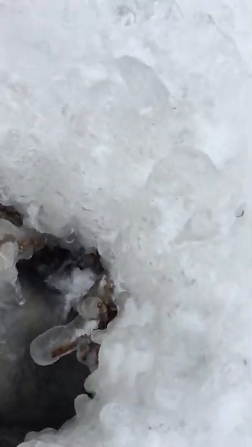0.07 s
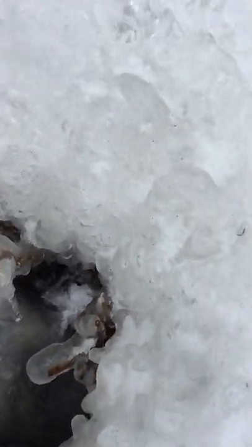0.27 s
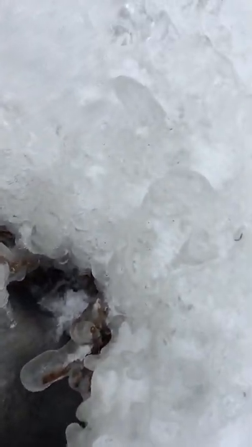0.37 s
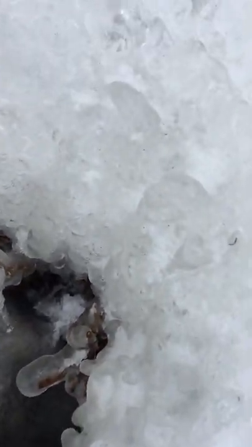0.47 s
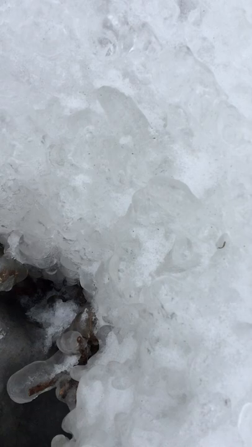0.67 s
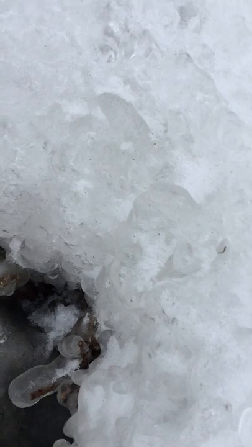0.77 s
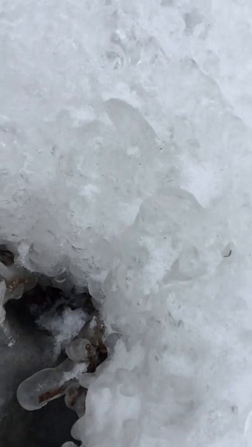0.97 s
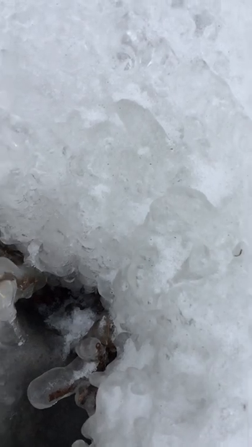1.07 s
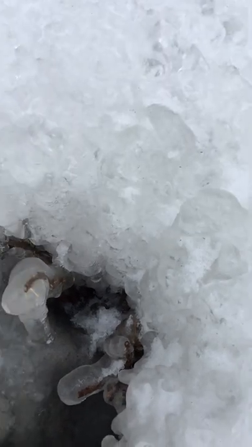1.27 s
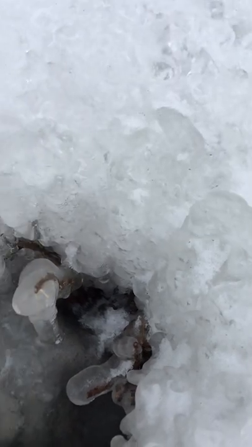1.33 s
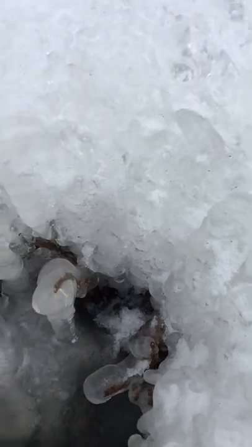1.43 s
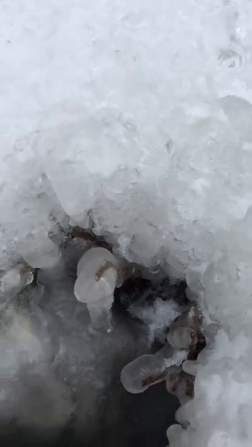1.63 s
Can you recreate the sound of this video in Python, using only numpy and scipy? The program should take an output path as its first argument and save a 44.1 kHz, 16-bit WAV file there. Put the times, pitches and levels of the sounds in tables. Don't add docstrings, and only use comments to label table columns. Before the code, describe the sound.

Wind buffeting on a handheld microphone outdoors: quiet low rumble at first, then soft bassy thuds from 0.2 s, strongest around 0.43-0.65 s, and lesser gusts until 1.1 s. Tiny dry handling ticks come near 0.3, 0.43, 0.54, 0.65-0.75 and 1.05 s, with faint skin rustle and a sharper snap at 0.99 s. Afterwards dull distant wash, faint wavering hum and steady hiss remain; a thin high tick at 1.64 s.

```python
import sys
import numpy as np
from scipy import signal
from scipy.io import wavfile

SR = 44100
rng = np.random.default_rng(int(sys.argv[2]) if len(sys.argv) > 2 else 0)


def generate_wav(signal):
    frames = np.transpose(np.atleast_2d(signal))
    scaled = np.clip(frames, -1, 1) * 32767
    pcm = np.round(scaled).astype(np.int16)
    wavfile.write(sys.argv[1], SR, pcm)


def boost_factor(decibels):
    exponent = np.asarray(decibels, float) / 20
    return 10 ** exponent


N = 74970


def filtered(x, kind, hz, order=2):
    return signal.sosfilt(signal.butter(order, np.clip(hz, 10, 0.45 * SR), kind, fs=SR, output="sos"), x)


def rms_one(x):
    return x / np.sqrt(np.mean(x ** 2) + 1e-20)


def in_time(rows):
    return boost_factor(np.interp(np.arange(N) / SR, *np.transpose(rows)))


def drift(rate):
    hop = 40
    r = np.exp(-2 * np.pi * rate * hop / SR)
    settle = 2000
    white = rng.standard_normal(N // hop + settle + 2)
    slow = signal.lfilter([1], [1, -2 * r, r * r], white)[settle:]
    return np.interp(np.arange(N) / hop, np.arange(len(slow)), rms_one(slow))


def coloured(spectrum, patchy_db):
    hz, db = np.transpose(spectrum)
    edges = 22 * 2 ** np.arange(0, 9.7, 1 / 3)
    white = rng.standard_normal((2, N + SR // 4))
    left = db[0] - 19
    right = db[-1] - 20 * (hz[-1] < SR / 4)
    out = 0
    for k, (low, high) in enumerate(zip(edges, edges[1:])):
        level_db = np.interp(np.log(low * high) / 2, np.log(hz), db, left=left, right=right)
        band = filtered(white[k % 2], "band", [low, high])[-N:]
        out = out + boost_factor(level_db + patchy_db * drift(3.4)) * band
    return rms_one(out)


def ring(clicks, hz, t60):
    r = boost_factor(-60 / (t60 * SR))
    w = 2 * np.pi * hz / SR
    return signal.lfilter([0, np.sin(w)], [1, -2 * r * np.cos(w), r * r], clicks + 1e-18)


def eddies(rows):
    t = np.arange(N) / SR
    phases = rng.uniform(0, 2 * np.pi, len(rows))
    out = 0
    for (s, db, hz, cycles), phase in zip(rows, phases):
        swell = np.exp(-2 * ((t - s) * hz / cycles) ** 2)
        out = out + boost_factor(db) * swell * np.cos(2 * np.pi * hz * (t - s) + phase)
    return out


def buffeting():
    # middle in seconds, peak in dB, frequency in Hz, width in cycles. Eddies of many
    eddy_rows = [(0.247, -38.5, 142, 1.9), (0.288, -37.5, 127, 3), (0.298, -31.5, 67.5, 1.67),
                 (0.415, -41, 172, 2.4), (0.427, -31.5, 241, 0.6), (0.433, -24.5, 150.3, 0.85),
                 (0.438, -41.5, 270, 2.9), (0.446, -31.5, 133, 1.1), (0.467, -32.5, 59, 1.8),
                 (0.47, -37.5, 132, 2.8), (0.474, -40.5, 218, 2.7), (0.502, -39.5, 307, 1.9),
                 (0.502, -35, 205, 2.4), (0.512, -32.5, 83, 1.6), (0.551, -40, 172, 1.3),
                 (0.567, -28.5, 111, 2.3), (0.568, -34.5, 184, 1.9), (0.595, -27, 105, 0.76),
                 (0.607, -31, 70.4, 1.1), (0.619, -27, 165, 0.92), (0.634, -27.5, 63, 0.98),
                 (0.707, -37, 96, 1.6), (0.786, -32, 72.3, 1.74), (0.864, -32.5, 73.5, 0.82),
                 (0.877, -30.5, 188, 0.55), (0.912, -37, 182, 1.65), (0.923, -32, 76.6, 1.15),
                 (0.937, -35, 187, 0.79), (1.016, -34.5, 54.3, 2.64), (1.04, -37.5, 202, 0.97),
                 (0.009, -44.5, 55.6, 2.3), (0.218, -43, 140, 3.8), (0.234, -47.5, 75, 4),
                 (0.326, -46.5, 95, 0.74), (0.404, -38.5, 97, 0.67), (0.41, -39, 301, 1.23),
                 (0.432, -33.5, 78.4, 1.4), (0.468, -47.5, 333, 2.5), (0.49, -42, 192, 1.3),
                 (0.567, -32, 61.3, 0.69), (0.58, -56, 162, 1.5), (0.595, -44.5, 203, 2.3),
                 (0.619, -49, 333, 2.9), (0.675, -47.5, 72, 1.9), (0.752, -44, 44.4, 5.5),
                 (0.782, -39.5, 125, 2.1), (0.84, -43.5, 52.6, 2.9), (0.888, -34, 65.4, 0.77),
                 (0.962, -44, 194, 1.1), (0.993, -39.5, 119, 1.4), (1.063, -42, 76, 4),
                 (1.079, -44.5, 130.5, 2.8), (1.12, -44, 40.4, 1.34), (1.322, -48, 56, 2.9),
                 (1.453, -56.5, 49.2, 11), (1.645, -41, 54, 0.55),
                 (0.249, -53, 292, 2.2), (.297, -49, 266, 1.8), (.623, -61, 410, 2.1),
                    (0.783, -48, 262, 0.86), (.545, -51.5, 402, 4.8), (0.912, -44.5, 334, 1.5),
                    (0.936, -49.5, 350, 1.7)]
    faint_rows = [(.08, -54, 63.5, 1.5), (.135, -56, 51.5, 1.9), (.215, -53, 210, 1.7),
                  (.36, -45, 61.5, 1.5), (.409, -60, 430, 1.8), (.427, -66, 470, 1.3),
                  (.467, -64, 450, 1.5), (.505, -59, 550, 3), (.616, -65, 430, 4), (.96, -45, 95, 1.2),
                  (1.38, -55.5, 115, 1.3), (1.525, -52, 55, 1.8)]
    push_rows = [(0.3, -47.5, 96, 1.3), (.232, -51.5, 264, 2), (0.23, -54, 160, 1.1), (.335, -46, 95, 2),
                 (0.36, -57, 265, 2.2), (0.46, -39, 41, 1.2), (0.99, -44, 105, 0.78)]
    return eddies(eddy_rows) + eddies(faint_rows) + eddies(push_rows)


def turbulence():
    # time in seconds, level in dB, upper edge in Hz.
    gust_rows = [(0, -51.5, 106), (.1, -53.5, 130), (.18, -62, 135), (0.219, -48, 200), (0.311, -51, 220),
                 (0.379, -55, 108), (0.409, -50.5, 288), (.62, -47.5, 258), (.67, -47, 125),
                 (.8, -52.5, 156), (.88, -62, 273), (0.968, -54, 260), (1.049, -59, 198), (1.12, -59, 110),
                 (1.2, -57, 150), (1.28, -71, 99), (1.4, -51, 97), (1.6, -67.5, 103)]
    s, db, hz = np.transpose(gust_rows)
    t = np.arange(N) / SR
    tops = np.geomspace(60, 340, 7)
    place = np.interp(np.log(np.interp(t, s, hz)), np.log(tops), np.arange(7))
    white = filtered(rng.standard_normal(N + SR // 4), "high", 42.3)
    out = 0
    for k, top in enumerate(tops):
        steep = filtered(white, "low", top, order=3)
        noise = rms_one(filtered(steep, "low", 0.49 * top, order=1)[-N:])
        out = out + noise * np.clip(1 - abs(place - k), 0, 1)
    lumps_db, lumps_per_s = 2, 12
    return out * boost_factor(np.interp(t, s, db) + lumps_db * drift(lumps_per_s))


def ticks():
    # start in seconds, peak in dB, ring in Hz, spread of the slips in seconds, bare edge in dB.
    tick_rows = [(.281, -59, 2300, 0.00094, -12), (.2827, -56, 2400, 0.00038, -6),
                 (0.2816, -58, 5660, .0004, -1), (.2828, -62, 14500, 0.00037, 0),
                 (.2892, -63, 5470, 0.00098, -1), (0.296, -59, 2500, .0015, -4),
                 (.297, -63, 11400, 0.0011, -4), (.2976, -60, 5100, 0.0012, -6),
                 (.3002, -63, 14100, 0.001, -10), (.3015, -66, 7100, .0008, -8),
                 (.31, -66, 6000, 0.0012, -3), (0.303, -69, 2300, 0.0015, -6),
                 (.433, -65, 2000, .0002, -15), (0.4334, -61.5, 3000, .0002, -12),
                 (0.433, -61, 4100, 0.000081, -13), (0.538, -63, 2210, 0.00075, -12),
                 (0.6542, -59.5, 3200, .0003, -16), (.6544, -60.5, 4250, .0002, -18),
                 (.6565, -60, 2700, 0.0007, -15), (.6816, -61, 6700, .0003, -20),
                 (.6858, -67, 6700, .00015, -20), (.6932, -68, 13600, 0.0011, -7),
                 (.6963, -59, 8000, 0.00045, -6), (0.697, -54, 2080, 0.0008, -8),
                 (.6962, -58, 2900, 0.0004, -10), (0.746, -63, 3920, 0.001, -18),
                 (1.0482, -60, 3250, .0016, -15), (1.0469, -59, 4030, .0006, -12),
                 (1.047, -59, 7200, .0008, -8), (1.048, -64, 5500, 0.00079, -10),
                 (1.643, -51, 10900, .001, -24), (1.643, -54, 12100, .0015, -24)]
    slip_loss_db, tone_db = 6, -4
    ring_cycles, ring_s = 9, 0.0014
    slip = np.arange(4)
    luck = rng.random((60, 2, 4))
    out = np.zeros(N)
    for (s, db, hz, spread, edge_db), (when, size) in zip(tick_rows, luck):
        late = np.round(hz * spread * (when + slip) / 2) / hz
        clicks = np.zeros(N)
        np.add.at(clicks, np.round((s + late) * SR).astype(int), boost_factor(db - 1.6 * size - slip_loss_db * slip))
        out += boost_factor(edge_db) * filtered(clicks, "high", hz)
        out += boost_factor(tone_db) * ring(clicks, hz, ring_cycles / hz + ring_s)
    return out


def snap():
    # mode in Hz, level in dB, decay time t60 in seconds.
    case_modes = [(920, -18, .006), (1310, -1, 0.011), (1650, -3.5, 0.0057), (2020, -13, 0.0027),
                  (2700, -12, 0.0037), (3580, 0, 0.0047), (4350, 6, 0.0046), (7600, -16, .003),
                  (6400, -9, 0.0036), (9500, -3, 0.0052), (10900, -9, 0.003), (11600, -13, 0.004),
                  (14400, -14, 0.0044)]
    start_s, peak_db, edge_db = 0.9928, -57, -3
    echo_s, echo_db = 0.00021, -1.5
    clicks = np.zeros(N)
    clicks[int(start_s * SR)] = boost_factor(peak_db)
    clicks[int((start_s + echo_s) * SR)] = -boost_factor(peak_db + echo_db)
    return boost_factor(edge_db) * clicks + sum(boost_factor(db) * ring(clicks, hz, t60) for hz, db, t60 in case_modes)


def rustle():
    # middle in seconds, half length in seconds, rms level in dB.
    rustle_rows = [
        (0.299, 0.012, -80),
        (.305, 0.058, -77),
        (0.697, 0.0048, -70.5),
        (0.948, 0.067, -77.5),
        (1.062, 0.0022, -77),
    ]
    grains_per_s = 2700
    struck = rng.random(N) < grains_per_s / SR
    grains = struck * boost_factor(1.9 * rng.exponential(1, N)) * rng.choice([-1, 1], N)
    grains = grains + boost_factor(-12) * ring(grains, 2300, 0.004)
    grains = filtered(filtered(grains, "high", 1730), "low", 12000, order=1)
    t = np.arange(N) / SR
    swells = sum(boost_factor(db) * np.exp(-0.5 * ((t - s) / half) ** 2) for s, half, db in rustle_rows)
    return rms_one(grains) * swells


def hum():
    # time in seconds, rms level in dB.
    hum_rows = [(0, -80), (.3, -82), (.7, -75), (1, -72), (1.35, -69.5), (1.7, -71)]
    level = np.sqrt(2) * in_time(hum_rows) * boost_factor(0.7 * drift(3))
    return level * np.sin(2 * np.pi * 409.1 * np.arange(N) / SR + 0.25 * drift(2.5))


def hollow():
    hz, width_hz, level_db = 935, 85, -79.5
    peak = signal.iirpeak(hz, hz / width_hz, fs=SR)
    noise = signal.lfilter(*peak, rng.standard_normal(N + SR))[-N:]
    return boost_factor(level_db + 1.5 * drift(7.5)) * rms_one(noise)


def wash():
    # frequency in Hz, level in dB per Hz.
    wash_spectrum = [(30, -10), (55, -3), (165, -2.5), (300, -12), (480, -17), (900, -17), (1400, -27),
                     (2600, -36.5)]
    # time in seconds, gain in dB.
    wash_swell = [(0, 3), (.06, 2.5), (.25, -1.5), (.5, 1.1), (.95, 0.2), (1.2, -0.2), (1.7, 0.5)]
    return boost_factor(-60.5) * in_time(wash_swell) * coloured(wash_spectrum, patchy_db=0.7)


def hiss():
    # frequency in Hz, level in dB per Hz.
    hiss_spectrum = [(880, -44), (1500, -14), (2830, -12.5), (3250, -7), (4850, -11), (6080, -11),
                     (10500, -12.5), (11900, -12), (15500, -17)]
    return boost_factor(-78) * coloured(hiss_spectrum, patchy_db=0.15)


def notches(x):
    # frequency in Hz, width in Hz, depth from 0 to 1.
    notch_rows = [(2825, 150, 0.44), (4890, 210, 0.3), (7600, 430, 0.43), (10370, 270, 1)]
    for hz, width_hz, depth in notch_rows:
        x = x - depth * signal.lfilter(*signal.iirpeak(hz, hz / width_hz, fs=SR), x)
    return x


def scene():
    wind = buffeting() + turbulence()
    hand = ticks() + snap() + rustle()
    far = hum() + hollow() + wash()
    return (wind + hand + far)[None]


def top_cut(x):
    return signal.sosfilt(signal.butter(12, 15690, fs=SR, output="sos"), x)


def record(dry):
    x = notches(dry + hiss())
    x = signal.sosfiltfilt(signal.butter(1, 22.9, "high", fs=SR, output="sos"), x)
    x = signal.sosfilt(signal.ellip(10, 0.5, 50, 15800, fs=SR, output="sos"), x)
    return top_cut(x)


dry = scene()
out = record(dry)
generate_wav(out)
```